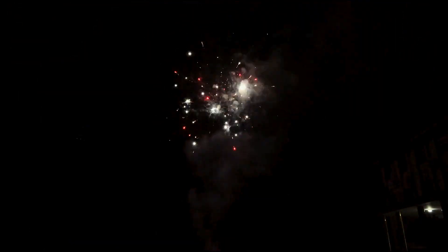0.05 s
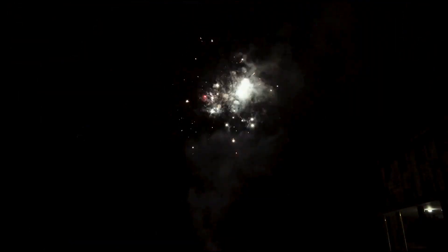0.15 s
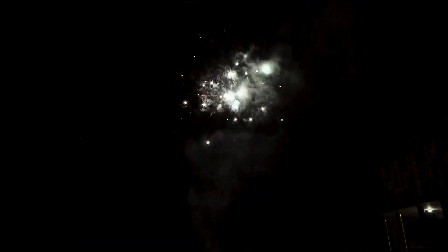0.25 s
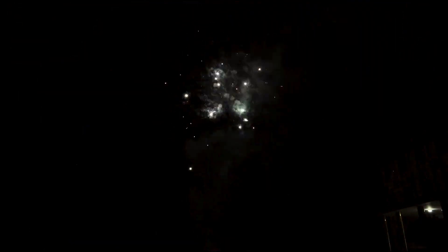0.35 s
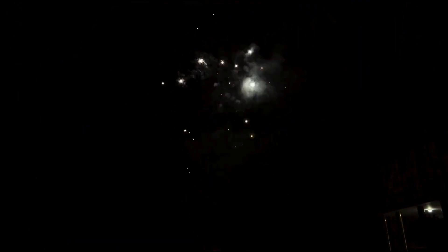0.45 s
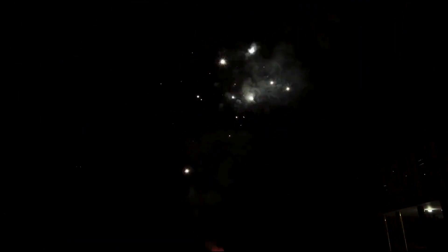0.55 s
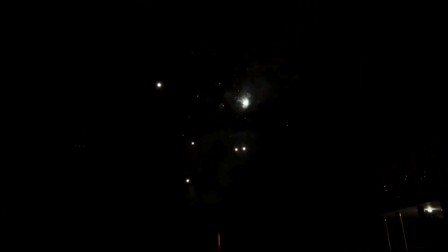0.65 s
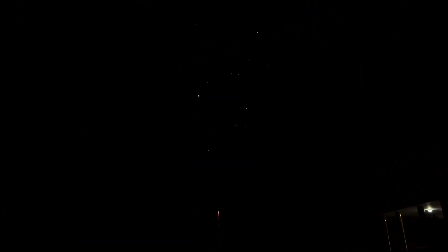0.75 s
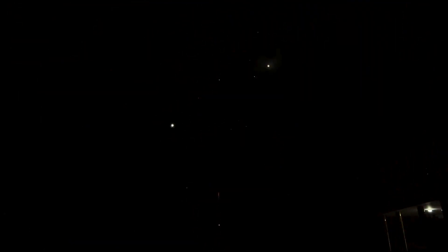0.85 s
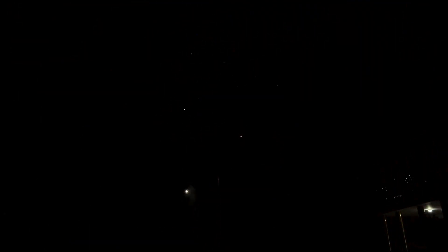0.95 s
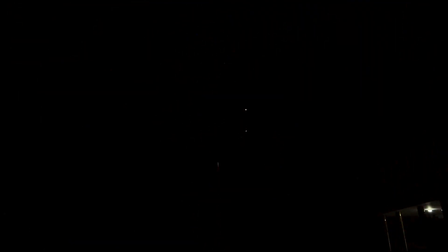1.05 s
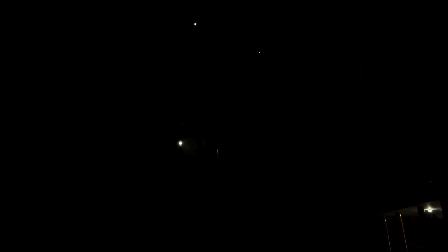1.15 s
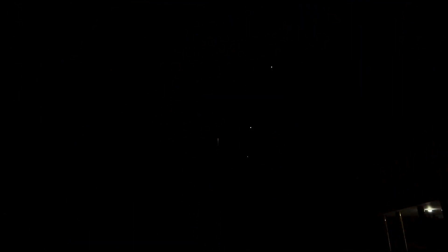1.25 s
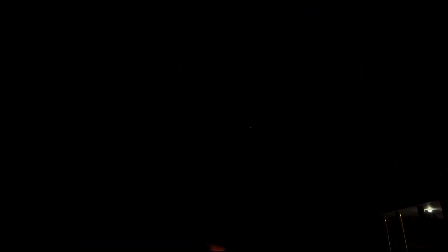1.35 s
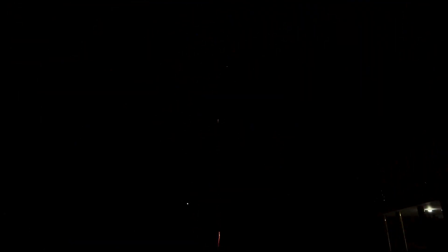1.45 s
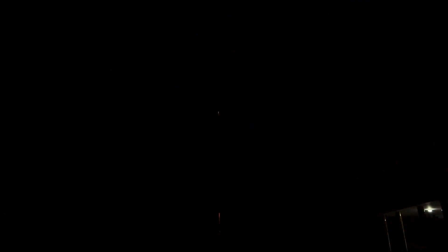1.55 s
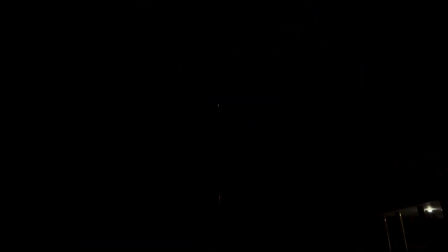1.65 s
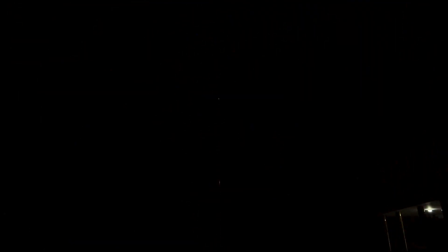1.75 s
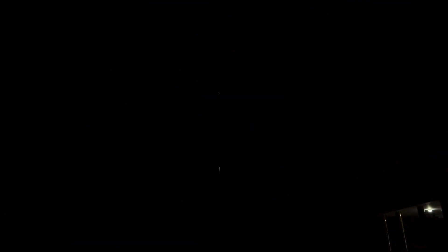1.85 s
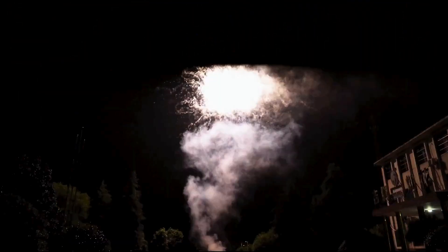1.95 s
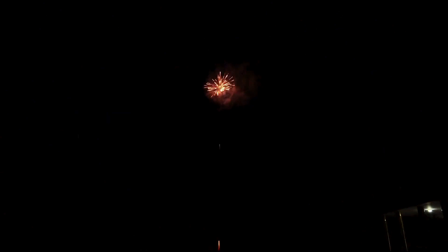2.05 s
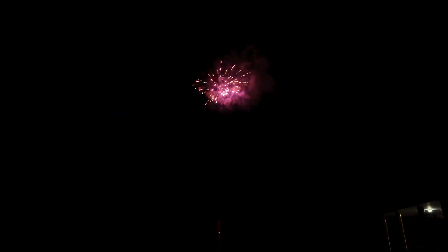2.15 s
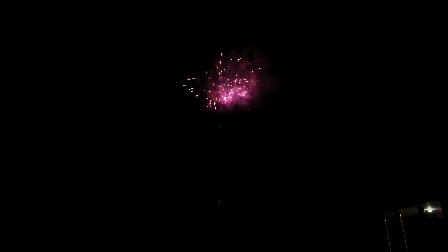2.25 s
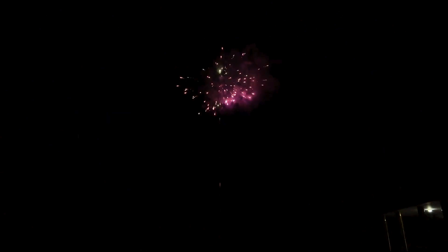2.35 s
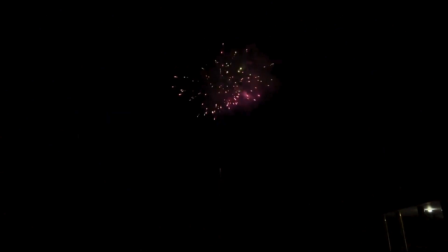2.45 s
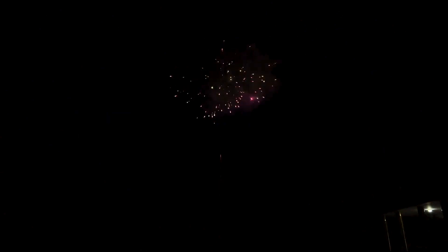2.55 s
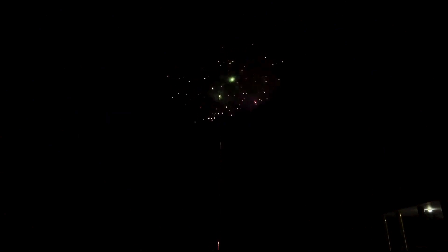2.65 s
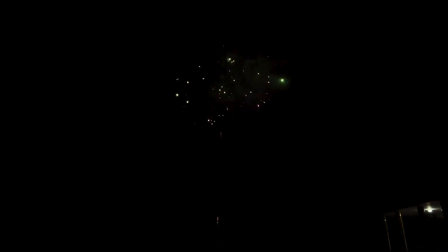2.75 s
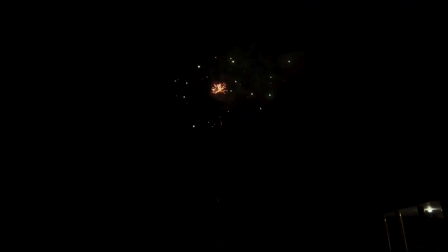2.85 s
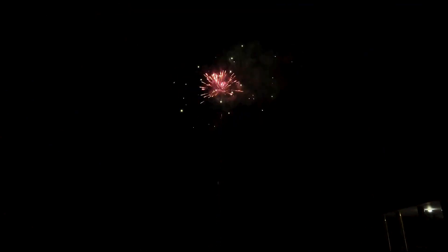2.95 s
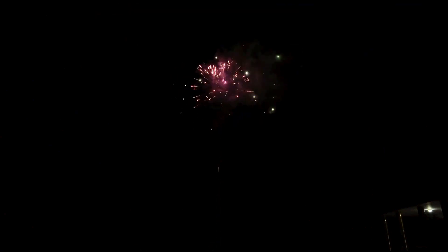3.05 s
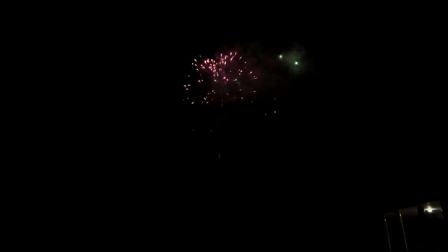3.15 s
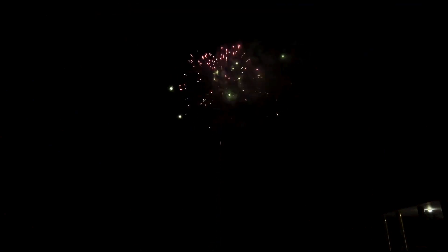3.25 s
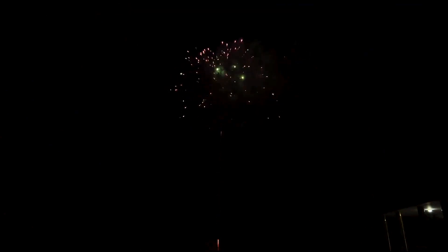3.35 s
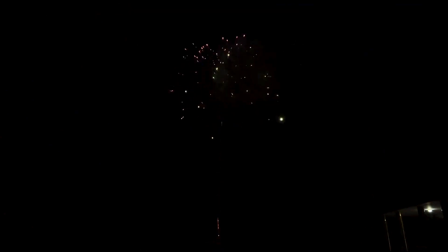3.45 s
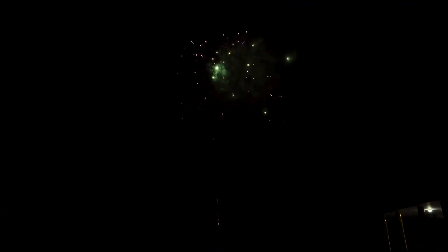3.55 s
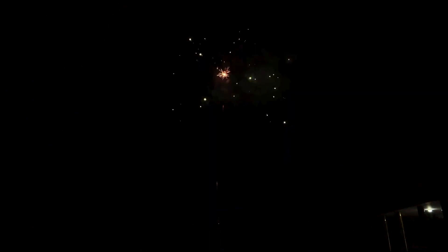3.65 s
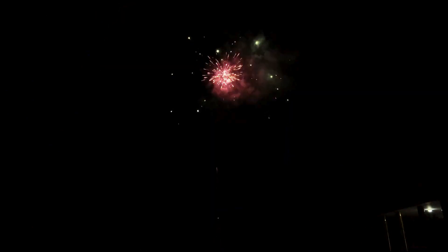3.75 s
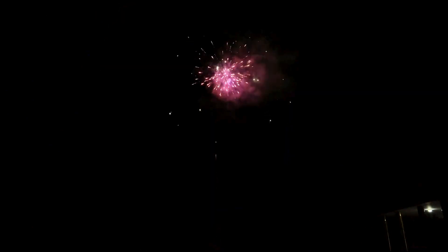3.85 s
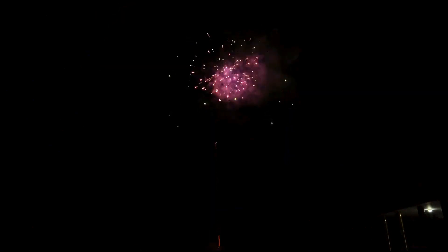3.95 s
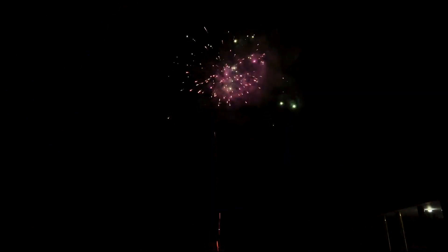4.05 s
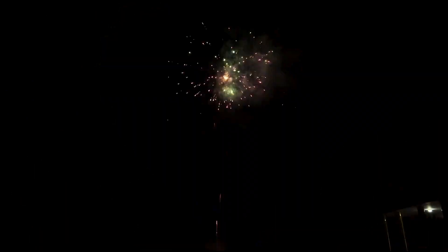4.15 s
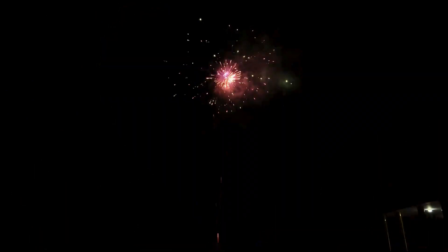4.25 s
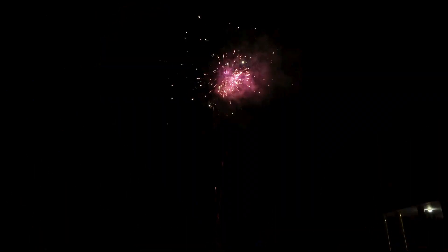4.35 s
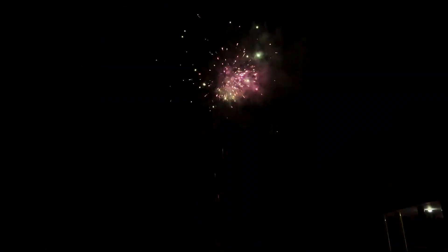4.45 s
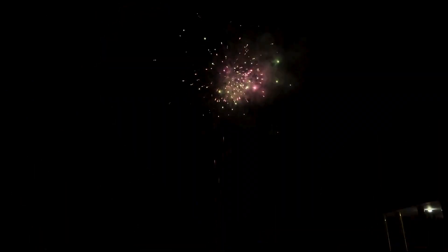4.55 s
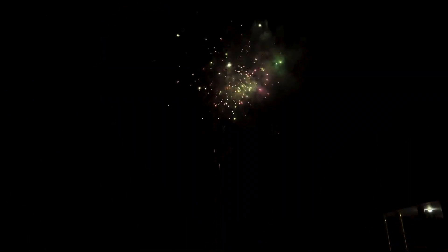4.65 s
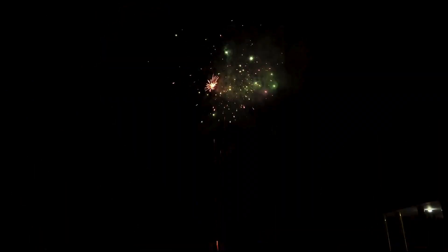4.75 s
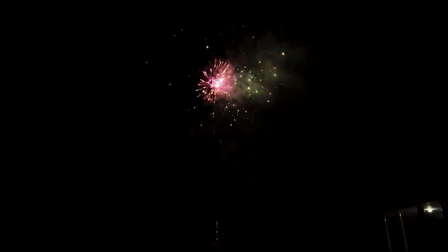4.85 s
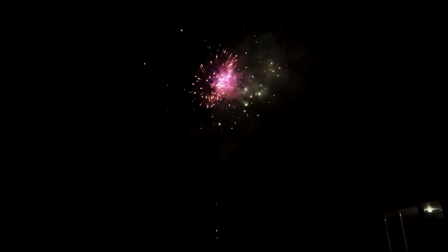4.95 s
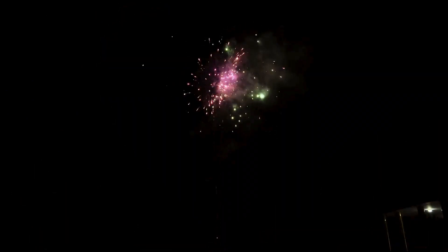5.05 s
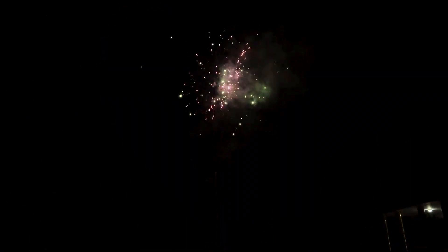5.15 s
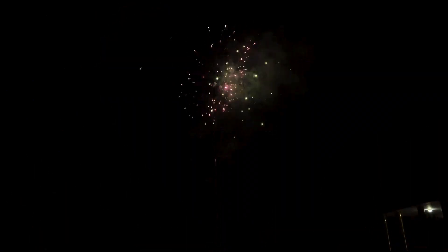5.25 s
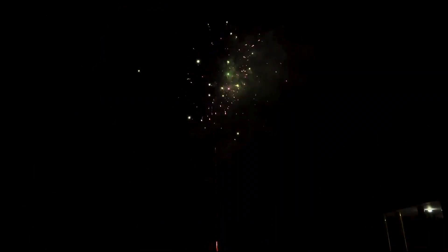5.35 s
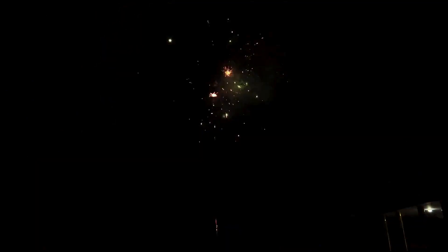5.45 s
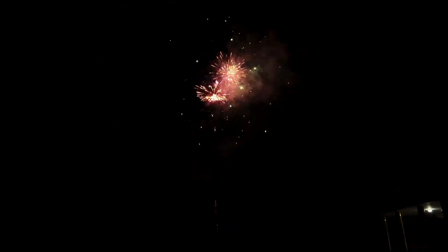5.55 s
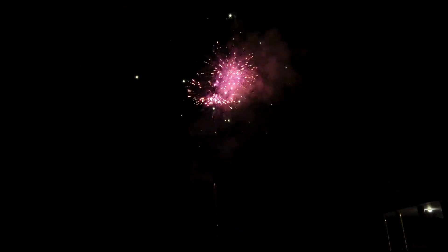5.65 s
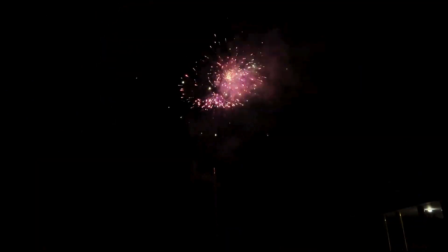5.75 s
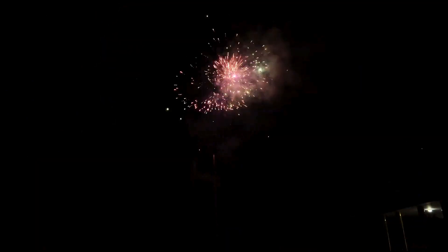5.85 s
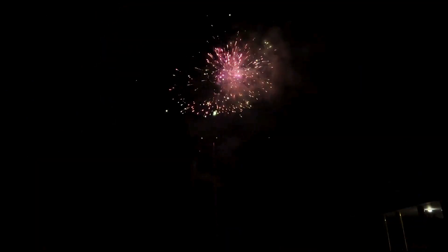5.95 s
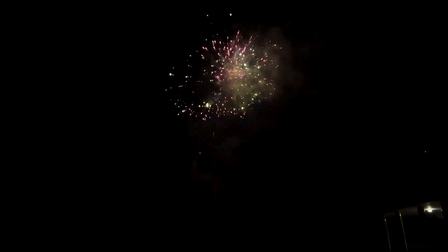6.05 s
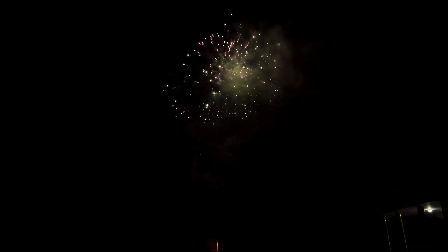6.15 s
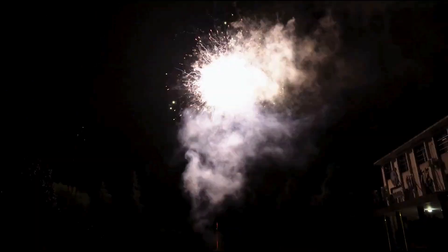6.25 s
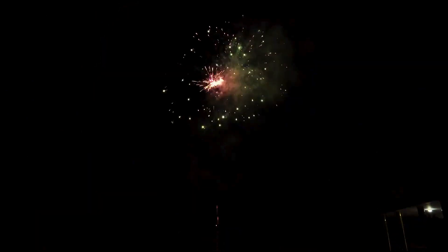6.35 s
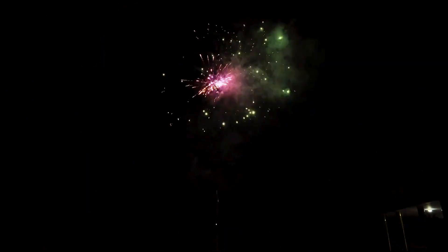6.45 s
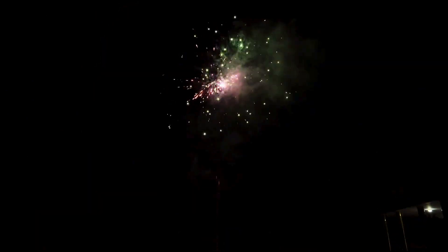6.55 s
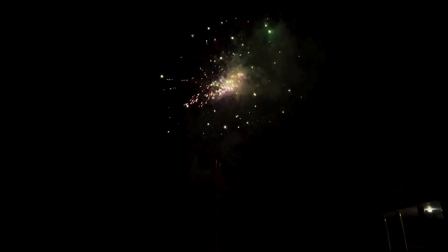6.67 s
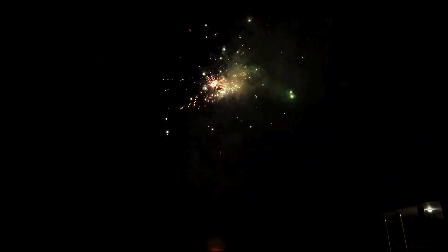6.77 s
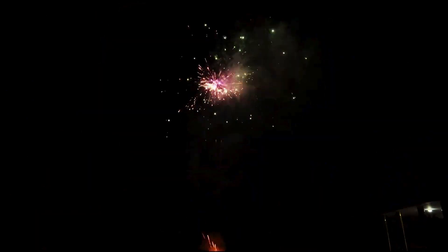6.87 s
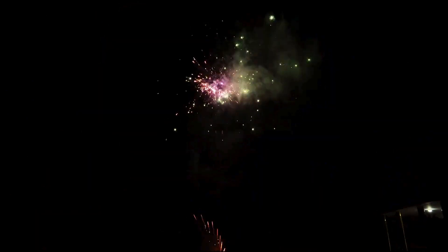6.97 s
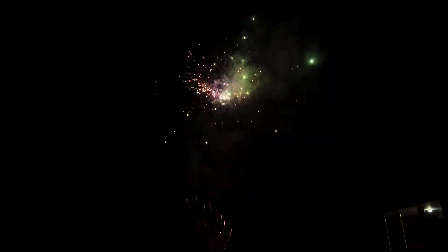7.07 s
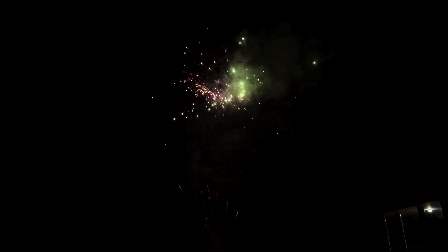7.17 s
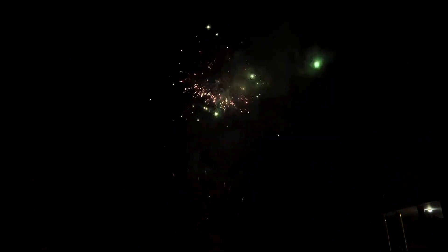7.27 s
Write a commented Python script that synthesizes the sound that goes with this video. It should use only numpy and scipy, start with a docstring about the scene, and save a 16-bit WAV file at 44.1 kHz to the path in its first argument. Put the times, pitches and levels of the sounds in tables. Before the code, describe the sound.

A firework battery goes off close by in a quiet residential street. A fading rolling echo opens, then dry, snapping tube shots, first well spaced, then paired and clustered. Aerial shells answer with broader, deeper bangs and clattering reverberation from the house fronts, with barely audible thin high whizzes. It ends on a rattling volley, loud enough to squash at the microphone.

```python
"""A street between houses at night, with a firework cake close by; the still air is a low filtered-noise hush.
The sound opens in the rolling echo of a burst. Shots then leave the tubes with dry cracks, singly or bunched:
shaped shock pulses, with a rush of noise, short fading tones and wall knocks. Shells soon burst overhead with
fuller bangs, which ground and house fronts throw back; faint thin whizzes glide by. A quick fan of seven
shots comes last. The shocks overload the microphone, which a limiter rounds off."""
import sys
import numpy as np
from scipy import signal
from scipy.fft import rfft, irfft
from scipy.io import wavfile
from scipy.ndimage import uniform_filter1d, minimum_filter1d

SR = 44100
rng = np.random.default_rng(int(sys.argv[2]) if len(sys.argv) > 2 else 0)


def file_out(sig):
    """Save sig as 16-bit WAV at sys.argv[1]."""
    # one column per channel
    cols = np.atleast_2d(sig).T
    # limit, then scale
    lim = np.clip(cols, -1, 1)
    pcm = np.round(lim * 32767).astype(np.int16)
    wavfile.write(sys.argv[1], SR, pcm)


N = 322371
RING = 2 * SR  # length of an echo tail [samples]


def gain_of(db):
    """Decibels to an amplitude factor."""
    return 10 ** (np.asarray(db) / 20)


def read(points, hz):
    """A spectrum table read on a log-frequency axis."""
    f, value = np.transpose(points)
    return np.interp(np.log(hz + 1), np.log(f + 1), value)


def add(mix, s, sound):
    """Lays a sound into the mix from time s on; what falls before the start is cut off."""
    at = round(s * SR)
    sound = sound[:, max(-at, 0):]
    part = mix[:, max(at, 0):][:, :sound.shape[1]]
    part += sound[:, :part.shape[1]]


def causal(level_db, size=4096):
    """The most compact causal (minimum-phase) pulse with this spectrum."""
    log_gain = np.log(gain_of(np.r_[level_db, level_db[-2:0:-1]]))
    return irfft(np.exp(np.conj(signal.hilbert(log_gain)))[:size // 2 + 1])


# a tube's hollow bark and hard snap: centre [Hz], width [octaves]
BARK_HZ, BARK_OCTAVES = 2000, .35
SNAP_HZ, SNAP_OCTAVES = 4200, .33


def bump(hz, centre_hz, octaves):
    """A smooth bell around a centre on the octave scale."""
    return np.exp(-(np.log2(hz / centre_hz) / octaves) ** 2 / 2)


def pulse(points, tilt_db=0, bark_db=0, snap_db=0, size=4096):
    """A pulse of the given colour, tilted per octave about 1 kHz, with more or less tube bark and snap."""
    hz = np.fft.rfftfreq(size, 1 / SR)
    octaves = np.log2(np.maximum(hz, 125) / 1000)
    bark = bark_db * bump(hz + 1, BARK_HZ, BARK_OCTAVES)
    snap = snap_db * bump(hz + 1, SNAP_HZ, SNAP_OCTAVES)
    return causal(read(points, hz) + tilt_db * octaves + bark + snap)[None]


# width of the echo: (frequency [Hz], side minus mid [dB])
ECHO_WIDTH = [(30, -3), (60, -9), (140, -22), (240, -15), (380, -10.5), (600, -7), (950, -3.5), (1500, -1),
              (2400, 1.5), (3800, 0), (6000, -3), (9000, -3), (15000, -2)]
# the echo leans to one side: (frequency [Hz], left minus right [dB])
ECHO_LEAN = [(60, -1), (110, -0.5), (200, 0.5), (380, -0.5), (700, 1.5), (1290, 1), (2380, 1), (4400, 2),
             (8120, -0.5), (15000, 0.5)]


def diffuse(count):
    """Noise from all around: alike at both ears in the bass, unlike in the treble."""
    hz = np.fft.rfftfreq(count, 1 / SR)
    mid, side = rfft(rng.standard_normal((2, count)))
    width = gain_of(read(ECHO_WIDTH, hz))
    lean = gain_of(read(ECHO_LEAN, hz) / 2)
    left, right = (mid + width * side) * lean, (mid - width * side) / lean
    return irfft(np.array([left, right]) / np.sqrt(1 + width ** 2), count)


# still night air: (frequency [Hz], relative level [dB per Hz])
NIGHT_AIR = [(30, -9), (100, -12), (400, 13.5), (1500, 7), (3000, -36), (8000, -10), (15000, -12)]
NIGHT_DB = -54.5


def night():
    """A low even hush under everything: coloured noise at a steady level."""
    air = signal.oaconvolve(diffuse(N), pulse(NIGHT_AIR), axes=1)[:, :N]
    return gain_of(NIGHT_DB) * air / air.std()


# faint thin whizzes: (time [s], length [s], start frequency [Hz], end frequency [Hz], level [dB])
WHIZZ_GLIDES = [(1.46, .09, 15000, 14700, -51), (3.83, .1, 14000, 15700, -54),
                (6.92, .07, 14800, 12500, -46)]


def whizzes():
    """Very high, faint gliding hisses: sine glides whose strength flutters as slow noise."""
    out = np.zeros((2, N))
    for s, length, start_hz, end_hz, db in WHIZZ_GLIDES:
        count = int(length * SR)
        slow = signal.butter(2, 600, fs=SR)
        flutter = signal.lfilter(*slow, rng.standard_normal((2, SR)))[:, :count]
        tone = np.sin(2 * np.pi * np.cumsum(np.linspace(start_hz, end_hz, count)) / SR)
        add(out, s, gain_of(db) * np.hanning(count) * tone * flutter / flutter.std())
    return out


def answer(rows, rise_s, far_s, far_db):
    """The street's echo builds up, swells as each row of houses answers, and is prolonged by distant ones."""
    t = np.arange(RING) / SR
    near = sum(db * np.exp(-((t - delay) / spread) ** 2) for delay, spread, db in rows)
    far = far_db * np.clip(t / far_s - 1, 0, 1)
    return (1 - np.exp(-t / rise_s)) * gain_of(near + far)


# air and walls swallow the treble first: (frequency [Hz], time to fall by 60 dB [s])
ECHO_FADE = [(50, 0.62), (130, 1.72), (300, 1.68), (520, 2.16), (800, 2.18), (1500, 2.2), (3000, 1.83),
             (5000, 1.46), (8000, 1.16), (14000, 0.53)]


def roll(echoes, colour, tilt_db, swell, clump_db, clump_s, bark_db=0, snap_db=0, size=256):
    """Countless echoes arrive in clumps, swell as the houses answer, and die away band by band."""
    hz, delay, z = signal.stft(echoes, SR, nperseg=size)
    fade = gain_of(-60 * delay / read(ECHO_FADE, hz)[:, None])
    tail = signal.istft(z * fade, SR, nperseg=size)[1][:, :RING]
    t = np.arange(RING) / SR
    clumps = np.interp(t / clump_s, np.arange(RING), rng.standard_normal(RING))
    tail *= swell * gain_of(clump_db * clumps)
    tint = pulse(colour, tilt_db, bark_db, snap_db) / np.linalg.norm(pulse(colour))
    return signal.oaconvolve(tail, tint, axes=1)


def houses(colour, typical_s, spread, fall_db_per_s, ear_gap_s, count=22):
    """Single thuds off house fronts, spread from near to far, each from its own direction."""
    bearing, strength = rng.standard_normal((count, 2)).T
    rank = (np.arange(count) + rng.uniform(.05, .95, count)) / count
    delay = np.clip(typical_s * (rank / (1 - rank)) ** (spread / 2), .008, .9)
    size = np.sign(strength) * gain_of(2 * abs(strength) - fall_db_per_s * delay)
    taps = np.zeros((2, SR))
    for ear, side in enumerate((-1, 1)):
        arrival = delay + side * ear_gap_s * (bearing + .5) / 2
        taps[ear, np.round(arrival * SR).astype(int)] = size
    return signal.oaconvolve(taps, pulse(colour), axes=1)


def dulled(wave, edge_hz):
    """Rough ground and walls return little of the top treble."""
    return signal.lfilter(*signal.butter(1, edge_hz, fs=SR), wave)


def mono_bass(wave):
    """Longer waves reach both ears alike: the difference between the ears loses its bass."""
    mid, side = (wave[0] + wave[1]) / 2, (wave[0] - wave[1]) / 2
    side = signal.lfilter(*signal.butter(2, 240, "high", fs=SR), side)
    return np.array([mid + side, mid - side])


def shock(direct, reflected, slaps, turn_hz, scatter, scatter_s, slap_smear, size=2048):
    """The pressure front, its scatter off things close by, and the first hard reflections."""
    t = np.arange(size) / SR
    splash = diffuse(size) * np.exp(-t / scatter_s) * (1 - np.exp(-2 * t / scatter_s)) ** 2
    splash /= np.linalg.norm(splash, axis=1, keepdims=True)
    front = signal.unit_impulse(size)
    wave = signal.fftconvolve(front + scatter * splash, direct, axes=1)
    slap = signal.fftconvolve(front + slap_smear * splash[::-1], reflected, axes=1)
    for delay, left_db, right_db in slaps:
        add(wave, delay, gain_of([[left_db], [right_db]]) * slap)
    # the bass lags the treble, so the front swings both ways
    lag = np.exp(-2 * np.pi * turn_hz / SR)
    return signal.lfilter([lag, -1], [1, -lag], -mono_bass(wave))


def thump(push_s, rumble, rumble_hz, rumble_s, count=16384):
    """The blast's slow push and suck, and the deep rumble that lingers after it."""
    t = np.arange(count) / SR
    low = signal.lfilter(*signal.butter(2, rumble_hz, fs=SR), diffuse(count))
    return (1 - t / push_s) * np.exp(-t / push_s) + rumble * low / low.std() * np.exp(-t / rumble_s)


# shells bursting overhead, the first before the start: (time [s], shock level [dB], echo level [dB],
# delay of the nearest facade [s], its echo level [dB], extra brightness [dB per octave], thump level [dB])
SKY_BURSTS = [(-.23, 0, 2, .046, -3, -0.04, -26), (2.284, -9.5, -.5, 0.042, -3.5, 0, -4),
              (3.1268, -7, -1, 0.047, -1, 0, 4), (3.945, -6.5, 0, 0.052, -5.5, -0.13, 2.5),
              (4.4447, -7, -1.5, 0.048, -1.5, 0, 7), (5.0291, -7.5, -0.6, 0.045, -1.5, 0, 4),
              (5.7485, -8, -1, 0.053, 1, 0, 4), (5.7628, -14, -4, 0.032, 1, 0.5, -4),
              (6.033, -9, -2, .046, -1.5, 0.36, 4), (6.576, -7.5, -2, 0.043, -1, 0.5, 4),
              (7.0431, -8.5, -1.5, 0.046, 2.5, 0.5, 2)]
# spectrum of a burst's shock front: (frequency [Hz], level [dB])
BURST_FRONT = [(40, -52), (120, 2), (250, 25.5), (600, 31.5), (1000, 28.5), (1400, 26.5), (2500, 23),
               (5000, 14), (8000, 11.5), (16000, 4)]
# reflections off ground and walls: (delay [s], left level [dB], right level [dB])
BURST_BOUNCES = [(.0041, -7, -6.5), (.0066, -5.5, -4)]
# rows of houses that answer a burst: (delay [s], spread [s], swell [dB])
BURST_STREET = [(.049, 0.0024, 1.6), (.145, 0.035, 1.35)]
# spectrum of a burst's rolling echo: (frequency [Hz], relative level [dB per Hz])
BURST_ROLL_COLOUR = [(41, -59), (70, -32), (100, -25.5), (150, -16), (239, -10), (286, -8), (321, -6),
                     (517, -4), (579, -4.5), (815, -4), (1070, -9.5), (1690, -9), (3740, -17), (7060, -18),
                     (12500, -27), (14900, -30.5), (16000, -66)]
# house fronts return a dull copy of each burst: (frequency [Hz], level [dB])
HOUSE_COLOUR = [(40, -43), (120, -11.5), (250, 6), (500, 22.5), (850, 20.5), (1200, 6.5), (2000, 2),
                (4000, -12), (9000, -34), (16000, -40)]
# the nearest facade returns a brighter one: (frequency [Hz], level [dB])
FACADE_COLOUR = [(40, -42), (130, 0), (260, 13), (600, 21), (1200, 20), (2000, 8.5), (4000, -5),
                 (16000, -42)]
# blocks further down the street that thud back: (delay [s], level [dB])
STREET_BLOCKS = [(.125, -14.5), (.165, -10.5), (.26, -18), (.35, -26)]


def bursts():
    """Fuller bangs from above the roofs, which every wall around throws back."""
    out = np.zeros((2, N))
    bright_db, slap_edge_hz = 0.28, 5500  # brightness [dB per octave]
    thump_base_db, roll_db, house_db, facade_db, distant_db = -39.5, -17, -4, -6, -12
    swell = answer(BURST_STREET, rise_s=0.017, far_s=0.56, far_db=7.5)
    for s, shock_db, echo_db, near_s, near_db, tilt_db, thump_db in SKY_BURSTS:
        direct = pulse(BURST_FRONT, bright_db + tilt_db)
        reflected = dulled(direct, slap_edge_hz)
        bang = shock(direct, reflected, BURST_BOUNCES, turn_hz=1810,
                     scatter=0.63, scatter_s=0.001, slap_smear=0.044)
        add(out, s, gain_of(shock_db) * bang)
        push = thump(push_s=0.0098, rumble=0.05, rumble_hz=90, rumble_s=.11)
        add(out, s, gain_of(thump_base_db + thump_db) * push)
        fronts = houses(HOUSE_COLOUR, typical_s=.09, spread=.9, fall_db_per_s=61, ear_gap_s=0.000084)
        add(out, s, gain_of(house_db + echo_db) * fronts)
        # the nearest facade returns a tight bunch of claps, each block beyond it a bunch of thuds
        facade = houses(FACADE_COLOUR, typical_s=near_s, spread=0.11, fall_db_per_s=0,
                        ear_gap_s=0.00012, count=8)
        add(out, s, gain_of(facade_db + echo_db + near_db) * facade)
        for block_s, block_db in STREET_BLOCKS:
            block = houses(HOUSE_COLOUR, typical_s=block_s, spread=0.06, fall_db_per_s=1,
                           ear_gap_s=0.0001, count=4)
            add(out, s, gain_of(block_db + echo_db) * block)
        rolling = roll(diffuse(RING), BURST_ROLL_COLOUR, bright_db + tilt_db, swell,
                       clump_db=1.26, clump_s=.007)
        add(out, s, gain_of(roll_db + echo_db) * rolling)
        # distant houses drop single claps into the dying roll
        distant = houses(FACADE_COLOUR, typical_s=.36, spread=.55, fall_db_per_s=24,
                         ear_gap_s=0.00026, count=14)
        add(out, s, gain_of(distant_db + echo_db) * distant)
    return out


# walls close to the tubes answer every launch alike: (delay [s], left level [dB], right level [dB],
# lag of the right ear [s], brightness [dB per octave])
NEAR_WALLS = [(.0116, -5, -4.5, -.0001, 3.5), (0.0114, -12, -7, 0.005, 0.5), (0.0189, -6.5, -14, .0001, -2),
              (0.0261, -14, -10, .0002, -0.5), (0.0303, -16, -5, -.0002, -5.5),
              (0.0337, -15, -11, -0.0085, -2.5), (0.0398, -3, -10, -0.012, -1.5),
              (.0448, -6, -8, .0002, -5.5), (.053, -21, -17, 0.023, -3), (0.0624, -16, -14, -0.012, 3.5),
              (0.071, -21, -15, .0001, 0)]
# walls close to the tubes return a thud: (frequency [Hz], level [dB])
NEAR_WALL_COLOUR = [(40, -40), (90, -25), (150, -2.5), (250, -4.5), (450, 8), (750, 10), (1300, 19),
                    (1900, 9.5), (2400, -9), (3500, 9), (8000, -23), (16000, -39)]


def near_walls():
    """The fixed pattern of knocks that the walls around the cake return."""
    out = np.zeros((2, SR // 4))
    for delay, left_db, right_db, lag_s, tilt_db in NEAR_WALLS:
        knock = pulse(NEAR_WALL_COLOUR, tilt_db)
        add(out[:1], delay, gain_of(left_db) * knock)
        add(out[1:], delay + lag_s, gain_of(right_db) * knock)
    return out


def off_ground(wave):
    """A sound followed by its dull bounce off the road, which hollows it out."""
    bounce_s, bounce_db, edge_hz = 0.001386, -9, 1400
    out = wave.copy()
    add(out, bounce_s, gain_of(bounce_db) * dulled(wave, edge_hz))
    return out


def from_left(wave, gap_s):
    """A sound from slightly left of centre reaches the right ear a moment later."""
    count = wave.shape[1]
    hz = np.fft.rfftfreq(2 * count, 1 / SR)
    right = irfft(rfft(wave[1], 2 * count) * np.exp(-2j * np.pi * hz * gap_s))
    return np.array([wave[0], right[:count]])


def ignition(colour, size=1024):
    """A short spit as the lift charge catches: decaying noise in the crack's colour."""
    spit = diffuse(size) * np.exp(-np.arange(size) / SR / 0.005)  # decays over 5 ms
    return signal.fftconvolve(spit / np.linalg.norm(spit[0]), colour, axes=1)


def gas_rush(start_hz, end_hz, glide_s, width_hz, rise_s, decay_s, count=8192):
    """Hot gas rushes out of the tube; its broad hollow note sinks as the gas cools."""
    t = np.arange(count) / SR
    hz = end_hz + (start_hz - end_hz) * np.exp(-t / glide_s)
    low = signal.butter(2, width_hz / 2, fs=SR)
    rush = signal.lfilter(*low, rng.standard_normal((2, 2, count)))
    turn = 2 * np.pi * np.cumsum(hz) / SR
    note = (rush[0] * np.cos(turn) + rush[1] * np.sin(turn)) / rush.std()
    return (note + 1.1 * note[::-1]) * (1 - np.exp(-t / rise_s)) * np.exp(-t / decay_s)


# fixed pitches that close reflections give each shot: (frequency [Hz], level [dB], time to fall by 60 dB [s])
REFLECTION_TONES = [(1294, 9, 0.038), (1750, -8, 0.065), (2230, 3.5, 0.092), (4200, -11, 0.037),
                    (4340, -4, 0.098), (4870, -22, 0.045), (5100, -6, 0.032)]


def reflection_tones(snap_db, count=4096):
    """Short fading tones that close reflections give each shot; a harder snap brings out those near its pitch."""
    snap_share = 0.38
    t = np.arange(count) / SR
    out = np.zeros((2, count))
    for hz, db, t60 in REFLECTION_TONES:
        brought_out = snap_share * snap_db * bump(hz, SNAP_HZ, SNAP_OCTAVES)
        tone = np.sin(2 * np.pi * (hz * t + rng.random((2, 1))))
        out += gain_of(db + brought_out - 60 * t / t60) * tone
    return out


# lift charges in the tubes: (time [s], strength [dB], snap [dB], bark [dB], echo level [dB], thump level [dB])
SHOTS = [(0.8397, -3.5, 7, 2, 1.5, -6), (1.6201, -2, 5.5, 6.5, -.5, -8), (2.271, -2.5, 6, 1, -2, -4),
         (2.863, 0, 3, 2, 1.5, -3), (3.5685, -.5, 9, 4, -0.5, -5), (4.156, 0.5, 12.5, 5.5, -1, 3),
         (4.268, -1, 13, 6, -3, 3), (4.4398, -0.5, 14, 9, -0.5, 1), (4.966, 1.5, 8, 3.5, 1, 0),
         (5.5786, 3, 8, 7, 3.5, -12), (6.368, 1.5, 7, 15.5, 3, -11), (6.4604, 1.5, 13, 13, -3, 3),
         (7.0828, -9, -5, 5, -4, -8), (7.105, -6, 10, 12, -4, -6), (7.1258, -6, 14, 5, -4, -6),
         (7.151, -4, 12, 4, -1, -7), (7.1811, -2, 19, 10, 1, -2), (7.2083, -2, 13, 12, 0, -3),
         (7.2304, -0.5, 11, 9, -2.5, -2)]
# crack and slap levels over the run of tubes: (time [s], crack level [dB], slap relative to crack [dB])
TUBE_LEVELS = [(.8, 7, -6.5), (5.5, 3, -8), (6.5, 1, 1.5), (7.1, 3.5, 3)]
# spectrum of a launch's shock front: (frequency [Hz], level [dB])
LAUNCH_FRONT = [(40, -54), (85, -25), (150, 7), (300, 0), (650, 9.5), (1000, -6), (1400, 12.5), (2100, 14),
                (2800, 12.5), (4200, 8), (5300, 9), (6200, 8), (7700, 7), (10000, 2.5), (16000, -31)]
# first hard reflection: (delay [s], left level [dB], right level [dB])
LAUNCH_BOUNCES = [(.0074, -4, -11.5)]
# a wall down the street returns a hollow knock: (frequency [Hz], level [dB])
FAR_WALL_COLOUR = [(40, -40), (500, -10), (1100, -3), (1650, 14), (2400, -5), (16000, -35)]
# rows of houses that answer a launch: (delay [s], spread [s], swell [dB])
LAUNCH_STREET = [(.028, 0.047, 5.5), (.17, 0.024, 0.5)]
# spectrum of a launch's rolling echo: (frequency [Hz], relative level [dB per Hz])
LAUNCH_ROLL_COLOUR = [(41, -54), (90, -31), (145, -16), (230, -8.5), (376, -1.5), (554, -1.5), (779, -3),
                      (1310, -2), (1700, -4), (2540, -9), (3410, -12.5), (4580, -17.5), (5250, -15.5),
                      (8090, -17.5), (13000, -30), (14900, -37), (16000, -37)]


def launches():
    """Short hard cracks and a hollow rush; low between the houses, they raise near thuds and little echo."""
    out = np.zeros((2, N))
    ignition_lead_s, ignition_db = 0.00114, -10  # heard through the tube wall before the muzzle crack
    slap_tilt_db, rush_low_hz = -0.5, 350
    tones_db, thump_base_db, rush_db = -32.5, -37, -26.0
    wall_db, far_wall_db, roll_db = -0.5, -18.0, -32
    same_share = .6  # the cake stays put, so much of its echo repeats from shot to shot
    colour_share = 0.34  # how much of a shot's snap and bark its echo keeps
    swell = answer(LAUNCH_STREET, rise_s=0.0038, far_s=0.49, far_db=2.0)
    no_bass = signal.butter(2, rush_low_hz, "high", fs=SR)
    level_s, crack_db, slap_db = np.transpose(TUBE_LEVELS)
    street, walls = diffuse(RING), near_walls()
    for s, strength_db, snap_db, bark_db, echo_db, thump_db in SHOTS:
        # snap and bark colour the direct crack without adding to its energy
        direct = pulse(LAUNCH_FRONT, 0, bark_db, snap_db)
        even = np.linalg.norm(pulse(LAUNCH_FRONT)) / np.linalg.norm(direct)
        even *= gain_of(np.interp(s, level_s, crack_db))
        reflected = pulse(LAUNCH_FRONT, slap_tilt_db, bark_db, snap_db)
        reflected = gain_of(np.interp(s, level_s, slap_db)) * reflected
        crack = even * shock(off_ground(direct), reflected, LAUNCH_BOUNCES, turn_hz=2960,
                             scatter=0.4, scatter_s=0.00064, slap_smear=0.38)
        spit = even * ignition(direct)
        add(out, s - ignition_lead_s, gain_of(strength_db + ignition_db) * spit)
        add(out, s, gain_of(strength_db) * from_left(crack, gap_s=.000015))
        add(out, s, gain_of(strength_db + tones_db) * reflection_tones(snap_db))
        push = thump(push_s=0.0035, rumble=0.14, rumble_hz=80, rumble_s=.035)
        add(out, s, gain_of(thump_base_db + thump_db) * push)
        rush = gas_rush(start_hz=1849.4, end_hz=1400, glide_s=.018, width_hz=1180,
                        rise_s=0.0062, decay_s=0.032)
        add(out, s, gain_of(echo_db + rush_db) * signal.lfilter(*no_bass, rush))
        add(out, s, gain_of(echo_db + wall_db) * walls)
        far_wall = houses(FAR_WALL_COLOUR, typical_s=.18, spread=0.1, fall_db_per_s=10,
                          ear_gap_s=0.00023, count=14)
        add(out, s, gain_of(echo_db + far_wall_db) * far_wall)
        echoes = np.sqrt(same_share) * street + np.sqrt(1 - same_share) * diffuse(RING)
        rolling = roll(echoes, LAUNCH_ROLL_COLOUR, 0, swell, clump_db=1.25, clump_s=0.0041,
                       bark_db=colour_share * bark_db, snap_db=colour_share * snap_db)
        add(out, s, gain_of(echo_db + roll_db) * rolling)
    return out


def scene():
    """Night air, whizzes, bursts overhead and launches from the cake."""
    return night() + whizzes() + bursts() + launches()


def record(dry):
    """At the microphone a fast limiter rounds off shock peaks; a wind filter and a band limit follow."""
    ceiling, wind_hz, edge_hz = .97, 50, 16300
    allowed = 1 / (1 + (dry / ceiling) ** 4) ** (1 / 4)
    # the limiter holds and smooths its gain over a few samples
    held = minimum_filter1d(allowed, size=5, axis=1)
    squashed = dry * uniform_filter1d(held, size=5, axis=1)
    thinned = signal.lfilter(*signal.butter(1, wind_hz, "high", fs=SR), squashed)
    band = signal.firwin(255, edge_hz, window=("kaiser", 9), fs=SR)[None]
    return signal.oaconvolve(thinned, band, "same", axes=1)


dry = scene()
out = record(dry)
file_out(out)
```